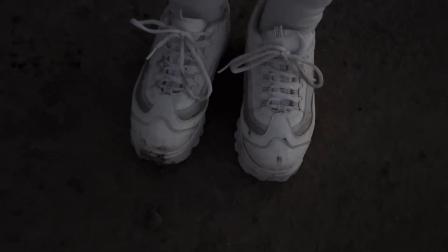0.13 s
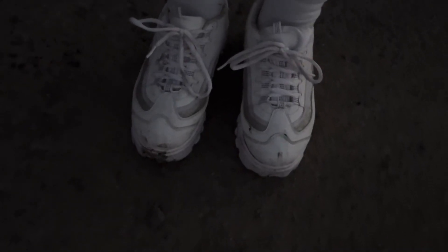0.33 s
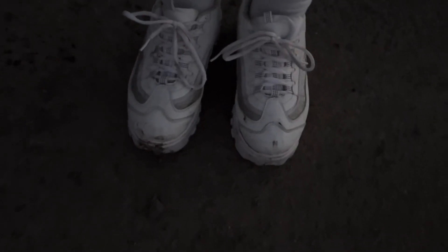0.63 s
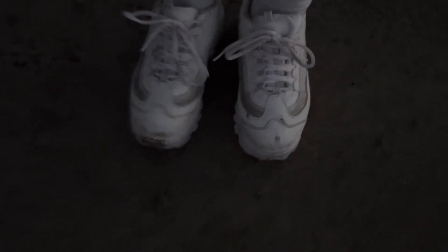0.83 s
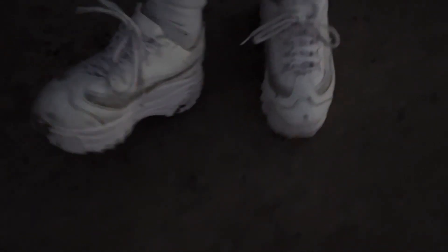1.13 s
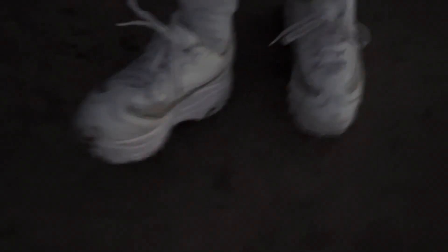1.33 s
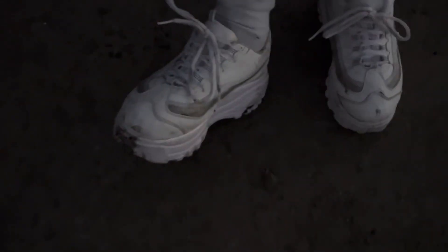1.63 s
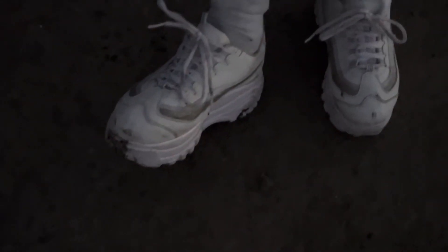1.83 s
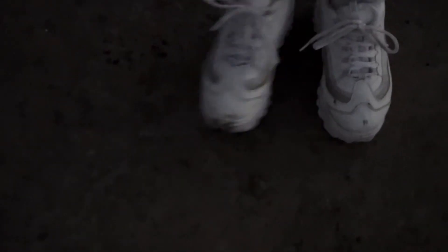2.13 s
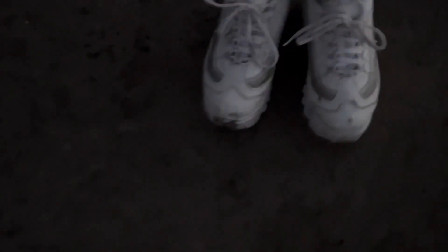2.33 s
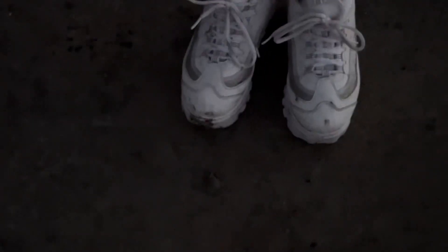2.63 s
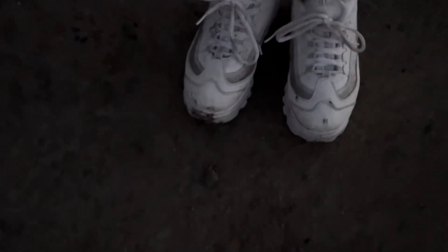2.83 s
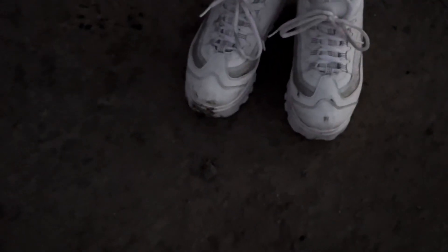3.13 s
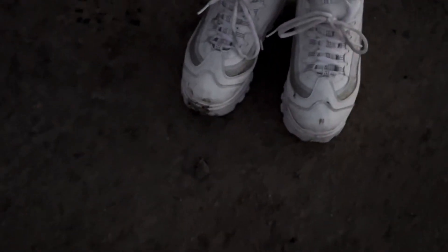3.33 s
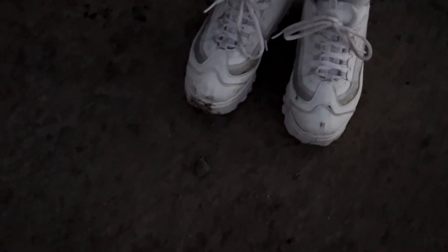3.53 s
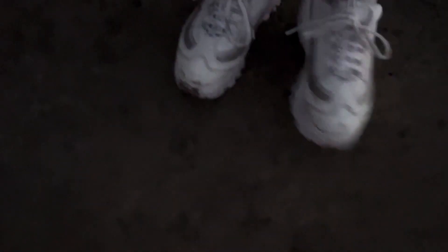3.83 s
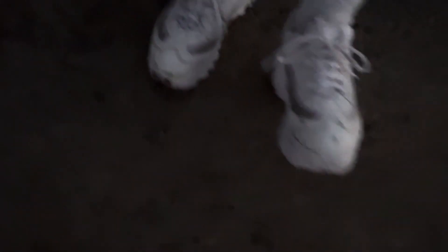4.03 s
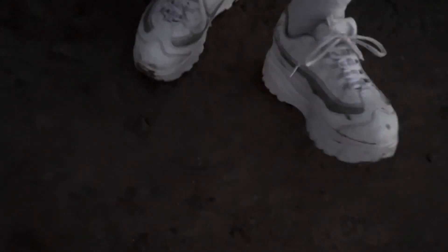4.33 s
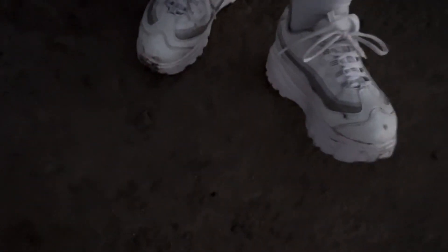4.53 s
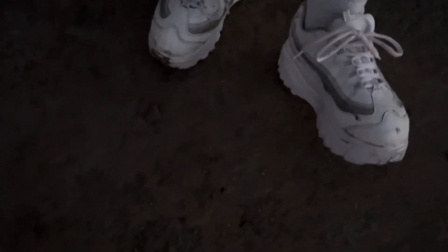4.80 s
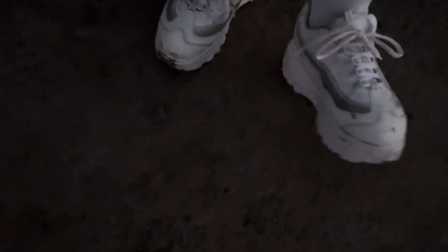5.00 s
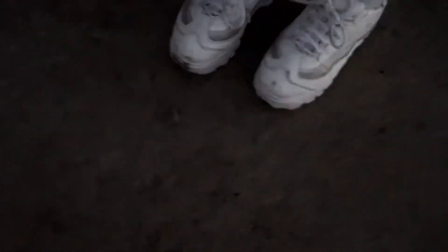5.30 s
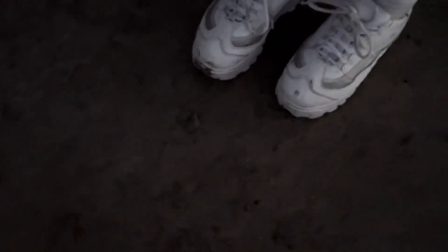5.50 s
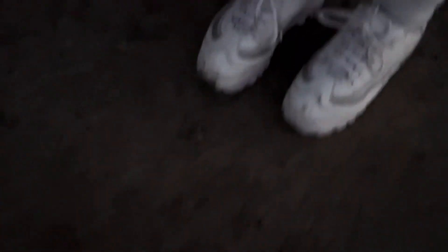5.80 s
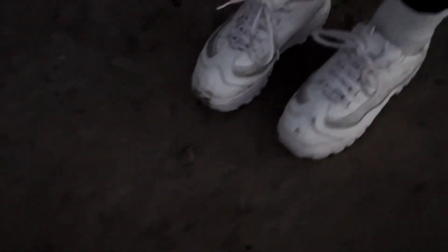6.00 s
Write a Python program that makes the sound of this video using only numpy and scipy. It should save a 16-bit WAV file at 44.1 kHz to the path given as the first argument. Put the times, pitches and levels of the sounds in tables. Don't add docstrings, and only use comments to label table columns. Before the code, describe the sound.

Outdoors, a heavy vehicle's low steady drone and rumble lead at first, then fade into a dull wash of far traffic. Close to the microphone, rubber soles shift on damp grit: one foot scrapes out, pauses, skids back, then the other does the same. Sandy hiss, sharp grain clicks and tiny wet pops mark each move.

```python
import sys
import numpy as np
from scipy import signal
from scipy.fft import rfft, irfft, next_fast_len
from scipy.io import wavfile
from scipy.ndimage import uniform_filter1d

SR = 44100
rng = np.random.default_rng(int(sys.argv[2]) if len(sys.argv) > 2 else 0)


def unload_audio(sound):
    columns = np.transpose(np.atleast_2d(sound))
    steps = np.round(np.clip(columns, -1, 1) * 32767)
    wavfile.write(sys.argv[1], SR, steps.astype(np.int16))


def gain_from_db(level_db):
    decades = np.asarray(level_db, float) / 20
    return 10 ** decades


N = 271471
REST_DB = -88


def evened(x):
    return x / np.sqrt(np.mean(x ** 2) + 1e-20)


def read(points, hz):
    f, value = np.transpose(points)
    return np.interp(np.log(hz + 1), np.log(f + 1), value)


def follow(rows):
    s, *columns = np.transpose(rows)
    return [np.interp(np.arange(N) / SR, s, column) for column in columns]


def colour(x, gain):
    margin = 4096
    wide = np.pad(x, margin, "reflect")
    size = next_fast_len(len(wide))
    spectrum = rfft(wide, size) * gain(np.fft.rfftfreq(size, 1 / SR))
    return irfft(spectrum, size)[margin:margin + N]


def band(x, low_hz, high_hz):
    edges = [low_hz, min(high_hz, .45 * SR)]
    return evened(signal.sosfilt(signal.butter(2, edges, "band", fs=SR, output="sos"), x))


def resonate(x, hz, width):
    turn = np.exp(2j * np.pi * np.cumsum(hz) / SR)
    r = np.exp(-np.pi * width / SR)
    return 2 * (turn * signal.lfilter([1 - r], [1, -r], x / turn)).real


def resonate_twice(x, hz, width):
    return evened(resonate(resonate(x, hz, width), hz, width))


def add(mix, s, sound):
    part = mix[round(s * SR):][:len(sound)]
    part += sound[:len(part)]


def ring(db, hz, t60, glide=0., onset=16):
    t = np.arange(2600) / SR
    turns = np.cumsum(hz * 2 ** (glide * 100 * np.minimum(t, .015))) / SR
    fade = gain_from_db(db - 60 * t / max(t60, 5e-4))
    return fade * np.sin(2 * np.pi * turns) * (1 - np.exp(-t * hz * onset))


def patches_db(shape, bins, frames):
    blotches = uniform_filter1d(rng.standard_normal(shape), bins, 0)
    return evened(uniform_filter1d(blotches, frames, 1))


def shear():
    grit_per_s, grit_spread_db, grit_share = 1400, 3, 0.3
    slip, hiss, sign = rng.standard_normal((3, N))
    hits = rng.random(N) < grit_per_s / SR
    grit = hits * np.sign(sign) * gain_from_db(grit_spread_db * np.minimum(rng.exponential(1, N), 5))
    stutter_db = 1.7 * evened(uniform_filter1d(slip, 200))
    sand = np.sqrt(1 - grit_share) * hiss + np.sqrt(grit_share) * evened(grit)
    z = signal.stft(sand, nperseg=128)[2]
    z *= gain_from_db(2.4 * patches_db(z.shape, bins=3, frames=12))
    return signal.istft(z, nperseg=128)[1][:N] * gain_from_db(stutter_db)


def pressure():
    # start/s, hold/s, pressure level/dB, fine sand share/dB
    shifts = [(0, 0.19, -69, -4.5), (0.47, 0.087, -80.5, -2.5), (0.738, 0.17, -66, -10),
              (0.906, 0.32, -71, -6), (1.302, 0.15, -95, -9.5), (1.876, 0.1, -78, -7),
              (1.986, 0.18, -81, -2), (2.18, 0.083, -71, -5), (2.332, 0.13, -77.5, -3),
              (2.526, 0.22, -85, -7), (3.592, 0.12, -75, -6), (3.773, 0.14, -73, -5.5),
              (4.042, 0.038, -76, -13), (4.089, 0.18, -66.5, -13), (4.325, 0.12, -80, -6),
              (4.751, 0.067, -88, -5), (4.918, 0.05, -70, -4), (5.088, 0.12, -75.5, -5),
              (5.247, 0.11, -70.5, -9), (5.8, 0.18, -82.5, -11), (6.07, 0.11, -71, -9)]
    press_db_per_s, lift_db_per_s = 350, 299
    t = np.linspace(0, N / SR, num=N // 32)
    press = gain_from_db(REST_DB) ** 2
    fine = gain_from_db(REST_DB - 11.5) ** 2
    for s, hold, db, fine_db in shifts:
        since = t - s
        lift_db = lift_db_per_s * np.maximum(since - hold, 0)
        drop_db = np.where(since < 0, -press_db_per_s * since, lift_db)
        press = press + gain_from_db(db - drop_db) ** 2
        fine = fine + gain_from_db(db + fine_db - drop_db) ** 2
    return follow(np.transpose([t, np.sqrt(press), np.sqrt(fine)]))


def crackle(press):
    grain_hz = [2200, 2800, 3600, 4600, 6200]
    bursts_per_s = 900
    hits = rng.random((len(grain_hz), N)) < bursts_per_s / SR / len(grain_hz)
    ticks = hits * np.minimum(rng.exponential(1, N), 2.5) * press
    return sum(signal.oaconvolve(x, ring(3, hz, t60=0.0019))[:N] for x, hz in zip(ticks, grain_hz))


def slides():
    # t/s, length/s, level/dB, fine sand share/dB, wet mud share/dB
    skids = [(0.792, 0.041, -64, -4, -2), (1.108, 0.017, -65, 1.5, 0), (1.893, 0.03, -61, -7, -28),
             (1.987, 0.0049, -79, 8, -5), (2.2, 0.031, -54.5, -8.5, -1.5), (2.226, 0.021, -53.5, -12, -16),
             (2.262, 0.068, -76, -5, 3), (2.621, 0.031, -83, -14, -16), (2.852, 0.032, -79.5, -24, -7),
             (3.609, 0.14, -69, -5, 4), (3.881, 0.014, -68.5, -16, 2.5), (4.052, 0.0031, -65, 19.5, 17),
             (4.06, 0.0029, -60, -3, -6), (4.125, 0.14, -63, 0.5, -38), (4.468, 0.01, -77, -7, 5),
             (4.755, 0.0088, -77, -6, -23), (4.969, 0.034, -67, -6, -29), (5.125, 0.035, -76, 2, 0),
             (5.264, 0.06, -68, -4, 8.5), (5.724, .012, -80, -25, -18), (5.739, 0.22, -83, -21, -21),
             (5.792, 0.0093, -83, -26, -14), (6.057, 0.033, -80.5, 6, 16)]
    firm_db, firm_hz, light_hz_per_db = -71.5, 5300, 122.5
    sand = shear()
    wide, fine, wet = band(sand, 2800, 10000), band(sand, 6900, 16000), band(sand, 930, 4020)
    press, dust = pressure()
    out = press * (wide + gain_from_db(1.0) * wet) + dust * fine + crackle(press - gain_from_db(REST_DB))
    for s, length, db, fine_db, wet_db in skids:
        at = slice(round(s * SR), round((s + length) * SR))
        hz = firm_hz + light_hz_per_db * max(firm_db - db, 0)
        width_hz = max(4498 + 130 * (db + 64.5), 1300)
        body = resonate_twice(sand[at], np.full(len(sand[at]), hz), width_hz)
        body += gain_from_db(fine_db - 1.5) * wide[at]
        skid = body + gain_from_db(fine_db) * fine[at] + gain_from_db(wet_db) * wet[at]
        add(out, s, gain_from_db(db) * skid * signal.windows.tukey(len(skid), .45))
    return out


def vehicle():
    # t/s, exhaust note f/Hz, note level/dB, rumble level/dB
    drive = [(0.0, 87, -35.5, -36.5), (0.1, 87.58, -36, -35.5), (.72, 86.06, -34.5, -37),
             (1.05, 86.29, -39, -39.5), (1.4, 86.86, -38.5, -35), (1.55, 86.56, -44.5, -39.5),
             (2.0, 87.03, -45.5, -38.5), (2.23, 80.26, -49.5, -45), (2.64, 91.47, -51, -40.5),
             (2.83, 87.3, -46.5, -46), (3.63, 91.55, -58, -42), (3.76, 87.7, -77, -58.5),
             (3.89, 78.54, -55, -40), (4.22, 88.5, -55, -48), (4.44, 83.4, -45, -47),
             (4.54, 90.56, -50.5, -43.5), (6.0, 89.9, -49.5, -46), (6.16, 94.8, -43.5, -53.5)]
    # f/Hz, level per Hz/dB
    rumble_colour = [(18, -44.5), (30, -7), (70, 4.5), (85, -6), (99, 2.5), (106, -7.5), (119, -28),
                     (130, -10), (170, -50), (290, -120)]
    hz, note_db, rumble_db = follow(drive)

    def fuzz(f, width_hz):
        return resonate_twice(rng.standard_normal(N), f, width_hz)

    note, low, high = fuzz(hz, 6.0), fuzz(hz * 2 / 3, 7.0), fuzz(hz * 5 / 3, 5.0)
    steady = np.sqrt(2) * np.cos(2 * np.pi * np.cumsum(hz) / SR + .5)
    rumble = evened(colour(rng.standard_normal(N), lambda f: gain_from_db(read(rumble_colour, f))))
    roar_db = uniform_filter1d(rumble_db, SR) - 16.5
    roar = gain_from_db(roar_db) * band(rng.standard_normal(N), 190, 446)
    orders = gain_from_db(-9) * low + gain_from_db(-19) * high
    exhaust = gain_from_db(note_db) * (1.45 * steady + .35 * note + orders)
    return exhaust + gain_from_db(rumble_db + 1.6) * rumble + roar


def traffic():
    # t/s, level/dB
    wash = [(0.0, -44.5), (0.19, -49.5), (0.39, -48), (1.71, -47.5), (2.67, -48.5), (3.03, -47.5),
            (4.34, -49.5), (6.16, -49)]
    # f/Hz, level per Hz/dB
    ahead_colour = [(65, -33.5), (110, 0), (150, 0.5), (174, -0.5), (214, -5), (305, -10.5), (346, -16),
                    (660, -22), (764, -15), (884, -23.5), (1790, -30.5), (2150, -37.5), (2600, -38.5),
                    (2900, -45), (3420, -46), (4880, -63.5), (8600, -64), (10200, -78), (11600, -72.5),
                    (16000, -74.5)]
    # f/Hz, level per Hz/dB
    aside_colour = [(18, -44), (30, -20.5), (86, 1), (118, -7), (215, -5), (311, -15.5), (345, -7.5),
                    (486, -18), (616, -6.5), (1670, -24), (2010, -48.5), (2170, -53.5), (3490, -46),
                    (4530, -63.5), (16000, -76)]
    # f/Hz, share in step, share a quarter turn ahead
    lean = [(59, -0.053, -0.1), (323, 0.32, -0.5), (546, -0.57, -.3), (800, -0.11, 0.5), (1210, -0.14, 0.4),
            (1400, -0.8, -0.2), (2000, -0.37, 0.2)]
    # f/Hz, width/Hz, level/dB
    street = [(563.3, 70, 6.5), (804, 130, 0), (1022, 36, 6.5), (1820, 240, 4)]
    front, other = rng.standard_normal((2, N))
    lean_hz, in_step, ahead = np.transpose(lean)

    def tie(f):
        return np.interp(f, lean_hz, in_step) + 1j * np.interp(f, lean_hz, ahead)

    def untied(f):
        return np.sqrt(np.clip(1 - abs(tie(f)) ** 2, .05, 1))

    def hollow_db(f):
        return sum(db / (1 + (2 * (f - top_hz) / width) ** 2) for top_hz, width, db in street)

    side = colour(front, tie) + colour(other, untied)
    front = evened(colour(front, lambda f: gain_from_db(read(ahead_colour, f) + hollow_db(f))))
    side = gain_from_db(-7.5) * evened(colour(side, lambda f: gain_from_db(read(aside_colour, f))))
    z = signal.stft(np.array([front, side]), nperseg=1024)[2]
    shape = z.shape[1:]
    drift_db = 1.12 * patches_db(shape, bins=10, frames=6)
    drift_db += .9 * patches_db(shape, bins=30, frames=25)
    treble = np.clip(np.fft.rfftfreq(1024, 1 / SR)[:, None] / 1000 - 2, 0, 1)
    drift_db += 2.5 * patches_db(shape, bins=25, frames=10) * treble
    drifting = signal.istft(z * gain_from_db(drift_db), nperseg=1024)[1][:, :N]
    front, side = drifting * gain_from_db(follow(wash)[0])
    return np.array([front + side, front - side])


def snaps():
    # t/s, peak level/dB, centre f/Hz, fine
    # edge level against the peak/dB, dull knock level against the peak/dB
    grain_snaps = [(0.6864, -43.5, 5954, -3, -13.5), (0.7127, -49, 3724, -28, -2),
                   (0.715, -46.5, 3370, -32, -9), (0.7319, -39.5, 3900.0, -6.5, -7),
                   (0.7412, -39.0, 5430, -13.5, -14.0), (0.7454, -52, 6400.0, -11, -14),
                   (0.7647, -44.5, 5200.0, -7, -13), (0.771, -39, 6000.0, -12, -26),
                   (0.7745, -44, 5400.0, -15.5, -12), (0.7852, -37, 4100.0, -18, -16),
                   (0.8009, -38.5, 4700.0, -7.5, -9), (0.8147, -34, 6800.0, -1, -14),
                   (0.8284, -58.5, 4800.0, 16, -8), (0.8342, -45.5, 5200.0, -7, -26),
                   (0.8389, -50.5, 5700.0, 2, -18.0), (0.8487, -42, 3700.0, -25.0, -9),
                   (0.8678, -50.5, 7500.0, 6.5, -6.0), (0.8995, -39, 3700.0, -27, -11),
                   (0.9194, -45, 3700.0, -18.0, -2.5), (0.9274, -49.5, 7300.0, -1, -16.0),
                   (0.9704, -55.0, 6600.0, 0, -16.0), (0.9784, -51, 7200.0, -7.0, -17),
                 (0.9845, -54.0, 5100.0, -20, -17.0), (0.995, -46, 5400.0, -11.0, 1.5),
                 (1.0098, -42.5, 3900.0, -6, -9.5), (1.0238, -62, 4800.0, -11.0, -13.0),
                 (1.068, -47, 6700.0, -3, -14), (1.077, -59, 7300.0, -4, -16), (1.115, -51, 6120, -8, -25),
                 (1.12, -50, 6380, 2, -24), (1.2056, -43.0, 5500, -4, 1), (1.3767, -53.5, 8090, -7, -17.0),
                 (1.3833, -67.5, 5018, -9.0, -15), (1.4894, -56, 4100.0, -25, -12),
                 (1.553, -63, 7800.0, -8.5, -7.0), (1.5678, -71, 5100.0, -1.5, -8),
                   (1.909, -37, 5300.0, -31, -23), (1.9954, -56, 4400.0, -7.0, -8),
                 (2.0177, -72, 7010, 8.0, -8), (2.1943, -52, 5395, 2, -9),
                 (2.2124, -36, 5400.0, -4.0, -5.0), (2.2252, -34.5, 5000.0, -24.0, -3),
                 (2.2319, -42.5, 6540, 4.0, -18), (2.237, -31, 6600.0, -4.0, -18),
                 (2.2421, -34.5, 4100.0, -19.0, -9), (2.2539, -47.0, 7500.0, 12, -23.0),
                 (2.2786, -50, 4900.0, -17.0, -19), (2.2905, -44, 6100.0, -6.0, -23.0),
                 (2.3015, -43, 5400.0, -14.0, -17.0), (2.3054, -51.5, 6100.0, 1, -11.0),
                 (2.3477, -61, 5600.0, 1.0, -11.0), (2.3567, -42.5, 4380, -18, 0),
                 (2.3603, -53, 5100.0, -3, -24), (2.365, -51, 4800.0, -31, -19.0),
                 (2.3939, -53.5, 5390, -9.0, -5), (2.4372, -58, 4700.0, -4.0, -19),
                 (2.5317, -56, 3700.0, -20, -4), (2.5441, -57, 6314, -8, -10),
                 (2.5585, -51.5, 4500.0, -18, -7), (2.6185, -61, 7300.0, -18.0, -6),
                 (2.6272, -57, 5100.0, -13.0, -6.0), (2.6671, -55, 7300.0, -14.0, -19),
                 (2.6704, -65, 5600.0, 3.0, -12), (2.6825, -63, 6100.0, 9, -4),
                 (2.7357, -65, 7200.0, -16, -8), (2.7446, -56.5, 4714, -12.0, -3),
                 (3.3415, -57, 4313, -7, -14), (3.3461, -50.0, 4575, -5, 2.5),
                   (3.5052, -55, 4700.0, -37.0, -8), (3.5395, -57, 4300.0, -18.0, -6),
                  (3.58, -54, 4600.0, -16.0, -18.0), (3.6013, -46, 4900.0, -13.0, -3),
                  (3.6281, -57, 5800.0, -1.0, -11.0), (3.6309, -43.5, 4700.0, -10, -17),
                  (3.6676, -52, 4800.0, 5, -18), (3.6715, -38, 4600.0, -24.0, -16),
                  (3.6927, -46.0, 6600.0, -10.0, -7), (3.7001, -47.0, 6300.0, 6, -20.0),
                  (3.7126, -47.0, 4900.0, -15.0, -10.0), (3.726, -53, 5600.0, -1, -9.0),
                  (3.7617, -47, 5000.0, -12.0, -23.0), (3.765, -47.0, 4900.0, -13.0, -15.0),
                  (3.784, -56, 4400.0, -10.0, -15.0), (3.8, -55.0, 5800.0, -8.0, -15.0),
                  (3.8164, -46.5, 5500.0, -29.0, -24.0), (3.844, -41.5, 5500.0, -8, -20),
                  (3.8606, -51, 6200.0, -1.0, -15.0), (3.8789, -49.5, 5000.0, -5, -11),
                  (3.887, -55.5, 5600.0, 4, -4), (3.8926, -49, 5800.0, -10.0, -20.0),
                  (3.8955, -52.0, 6600.0, -12.0, -6), (3.942, -53, 4600.0, -14.0, -15.0),
                  (3.9982, -54, 4800.0, -5.0, -5), (4.0172, -56.0, 6000.0, -11.0, -6),
                   (4.042, -39, 4900.0, -28.0, -19), (4.055, -33, 7060, 7.5, -9),
                 (4.057, -39.5, 3880, -7.5, -18.0), (4.0607, -47, 6934, -5, -12),
                 (4.107, -58, 5000.0, -25.0, -11), (4.1223, -41, 5300.0, -15.0, -15.0),
                 (4.134, -53, 6800.0, -5.5, -22.0), (4.1413, -39, 5900.0, 2, -13.0),
                 (4.1949, -33.5, 6284, -6, -25.0), (4.199, -36, 5600.0, -18, -26),
                 (4.2205, -46, 6300.0, 0, -27), (4.2283, -51.5, 6650, -7, -17),
                 (4.244, -44.5, 4770, -9, -17), (4.263, -41.5, 4800.0, -4.5, -23),
                 (4.371, -54, 6400.0, -3, -8), (4.397, -54, 4300.0, -3, -6),
                 (4.4394, -54, 3700.0, -34.0, -8), (4.4636, -47, 5300.0, -9, -25),
                 (4.473, -54.0, 5300.0, -12.0, -20.0), (4.6112, -46.5, 5600.0, -16, -23.0),
                   (4.7603, -46, 5120, -12.0, -25.0), (4.8182, -65, 4800.0, -15.0, -6),
                  (4.8928, -39, 4570, -7, -10.0), (4.9166, -42, 5400.0, -10.0, -25.0),
                  (4.9373, -49.0, 5380, -1, -23.0), (4.9432, -44, 5500.0, 2, -18),
                  (4.9506, -34, 5050, -11.0, -17), (4.9663, -49, 7450, -2.0, -12.0),
                  (4.9878, -42, 5900.0, -12.0, -18.0), (5.1252, -51, 6020, -7.0, -21.0),
                  (5.1419, -44.5, 6196, -1, -4.5), (5.2033, -49, 5300.0, -8.0, -6),
                  (5.2247, -53, 4700.0, -13.0, -9), (5.2415, -49, 4600.0, -15.0, -2),
                  (5.2518, -50, 6200.0, -6.0, -19.0), (5.2607, -45, 6300.0, -8.0, -18.0),
                  (5.2735, -45, 6200.0, -11, -4.0), (5.2761, -43, 5000.0, -12, -10),
                  (5.279, -47.0, 5300.0, -16, -7), (5.3189, -43, 4210, -12, -2.0),
                  (5.3225, -47, 4268, -12, -11), (5.381, -59, 3800, -15, -5), (5.4872, -63, 3950, -2, -6),
                  (5.5135, -57, 3888, -4, -2), (5.5638, -56, 5500.0, -9.0, -13),
                  (5.7232, -61, 7040, -19.0, -19), (5.7964, -63, 7320, -17, -13),
                  (5.868, -57, 6400, -5, -12), (5.9365, -66, 6060, -8, -8),
                  (6.0561, -52.0, 4800.0, 0.0, -1), (6.0593, -50, 4700.0, -9, -14.0),
                  (6.0706, -45.0, 5700.0, 0.0, -1), (6.0771, -53, 5100.0, -2.0, -8)]
    rows = grain_snaps
    out = np.zeros((2, N))
    chance = rng.uniform(-1.2, 1, (len(rows), 5))
    for (s, db, hz, edge_db, knock_db), (a, b, c, place, e) in zip(rows, chance):
        body = ring(db + 3.0, hz, t60=.0014 * 1.25 ** a, onset=3.5)
        body += ring(db + knock_db + 0.1, 2650 * 1.12 ** c, t60=.0032)
        click = body + ring(db + edge_db - 0.1, 12900 * 1.12 ** b, t60=.0013)
        add(out[0], s, click)
        echo_s = .0004 * 1.6 ** e
        add(out[0], s + echo_s, gain_from_db(-11) * click)
        add(out[1], s, .5 * place * body)
    return out


def pops():
    # t/s, peak level/dB,
    # f/Hz, t60/s, glide/(octaves per 10 ms)
    pockets = [(.7115, -50, 7500, .012, .05), (.7125, -43.5, 3050, .025, -.02),
               (.794, -51.5, 2650, .036, -.32), (.828, -53, 3050, .044, .02),
               (.8985, -43, 3620, .008, -.05), (1.1265, -47, 2100, .006, -.1),
               (1.131, -51, 2800, .008, -.2), (1.262, -60, 1680, .08, 0), (1.376, -62, 8200, .004, 0),
               (2.2135, -44, 1500, .008, -.1), (2.2385, -40, 900, .012, -.4), (2.868, -69, 6700, .03, .01),
               (3.18, -54, 1300, .062, -.025), (4.054, -42, 750, .008, -.33),
               (4.0535, -43, 16000, .0012, 0), (4.892, -55, 15500, .0012, 0), (4.694, -64, 14000, .002, 0),
               (2.2075, -46, 2300, .012, -.05), (2.2255, -48, 1900, .006, -.1), (2.356, -52, 2000, .005, 0),
               (.7135, -51, 1750, .012, 0), (4.8185, -61, 4900, .007, 0), (4.838, -63, 4700, .009, 0),
               (4.858, -63, 5000, .008, 0), (2.2135, -45, 2450, .018, -.03), (4.0555, -46, 3200, .006, -.1),
               (4.992, -48, 350, .06, .3), (5.018, -41, 380, .024, -.18), (5.317, -53, 2200, .004, -.11),
               (5.322, -40, 2300, .0047, -.6), (6.07, -50, 2000, .015, -.1)]
    # t/s, level/dB, start f/Hz, length/s, fall/octaves
    gulps = [
        (5.140, -40.5, 1200, .0105, 1.35),
        (5.2735, -41.5, 720, .008, 1.2),
        (2.2095, -44, 950, .009, .9),
        (4.053, -47, 2300, .004, -.6),
    ]
    out = np.zeros(N)
    for s, *pocket in pockets:
        add(out, s, ring(*pocket))
    for s, db, hz, length, fall in gulps:
        u = np.linspace(0, 1, round(length * SR))
        turns = np.cumsum(hz * 2 ** (-fall * u)) / SR
        add(out, s, gain_from_db(db) * np.sin(np.pi * u) * np.sin(2 * np.pi * turns))
    return out


def scatter(x):
    t = np.arange(3000) / SR
    smear = rng.standard_normal(len(t)) * gain_from_db(-60 * t / 0.12) * (t > .001)
    return x + gain_from_db(-12.0) * signal.oaconvolve(x, smear / np.linalg.norm(smear))[:N]


def air():
    return gain_from_db(-105) * band(band(rng.standard_normal(N), 7300, 9700), 7300, 9700)


def scene():
    # f/Hz, lead of the left/rad
    ports = [(2100, 0), (3450, .25), (4500, -.03), (7000, -.1), (8050, -.4), (8850, -2.1), (9300, -3.0),
             (10600, -3.27), (11100, -4.0), (12400, -5.6), (13000, -6.28), (13900, -6.28), (15200, -8.2),
             (16000, -8.9)]
    grains, offset = snaps()
    shoes = scatter(slides() + grains) + pops()
    shoes += air()
    left = colour(shoes + offset, lambda f: np.exp(.5j * read(ports, f)))
    right = colour(shoes - offset, lambda f: np.exp(-.5j * read(ports, f)))
    vehicle_gain = gain_from_db(np.array([[.25], [-.25]]))
    return np.array([left, right]) + vehicle() * vehicle_gain + traffic()


def top_cut(x):
    return signal.sosfilt(signal.butter(12, 16530, fs=SR, output="sos"), x)


def record(dry):
    # f/Hz, level/dB
    microphone = [(20, -27.5), (32, -21), (42, -0.8), (8600, -2), (10000, 6), (11500, 0), (13500, -2.5),
                  (15300, 0.5), (16000, -6.5), (17200, -25.5)]
    whine_hz, whine_db, stop_s = 9603, -61.5, .0015
    heard = np.array([colour(x, lambda f: gain_from_db(read(microphone, f))) for x in dry])
    bass = colour(heard.mean(0), lambda f: abs(f - 87) < 12)
    heard += gain_from_db(whine_db) * bass * np.cos(2 * np.pi * whine_hz * np.arange(N) / SR)
    heard *= np.minimum(np.arange(N, 0, -1) / (stop_s * SR), 1)
    return top_cut(heard)


dry = scene()
out = record(dry)
unload_audio(out)
```